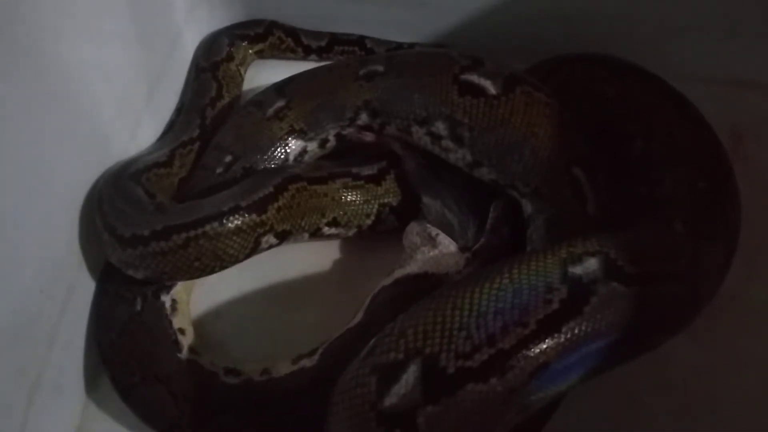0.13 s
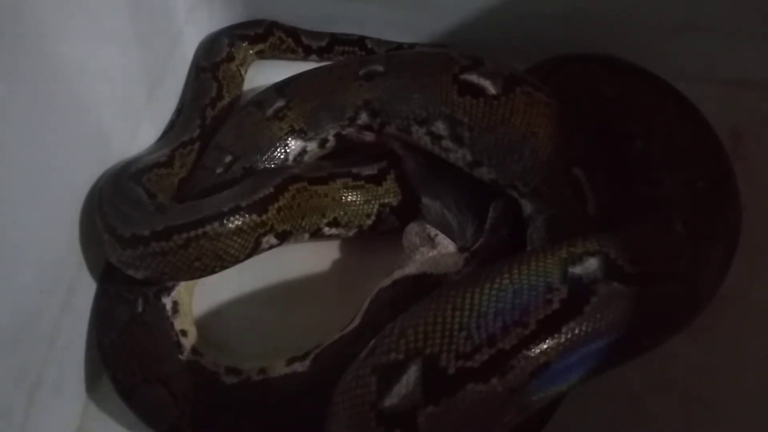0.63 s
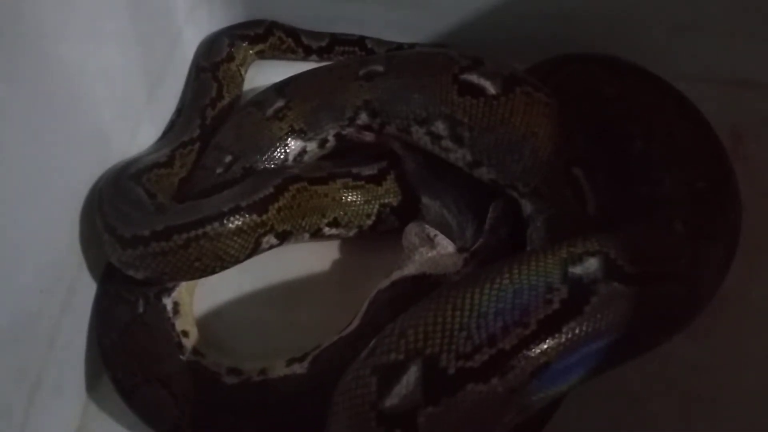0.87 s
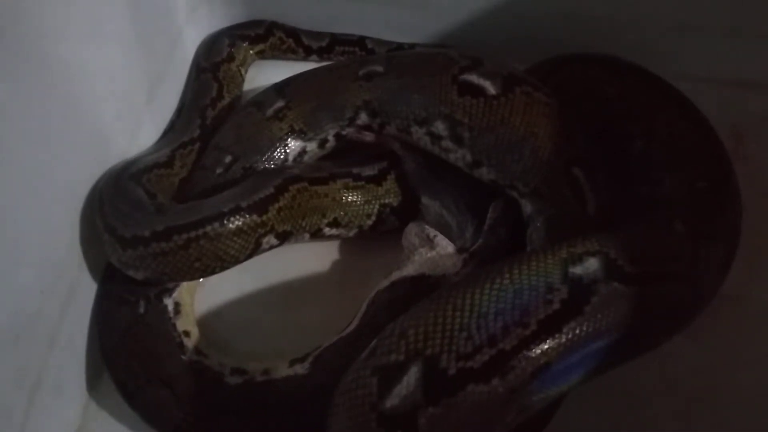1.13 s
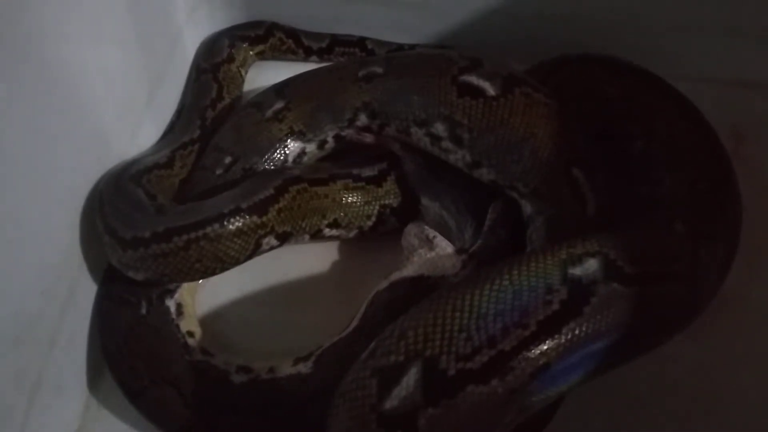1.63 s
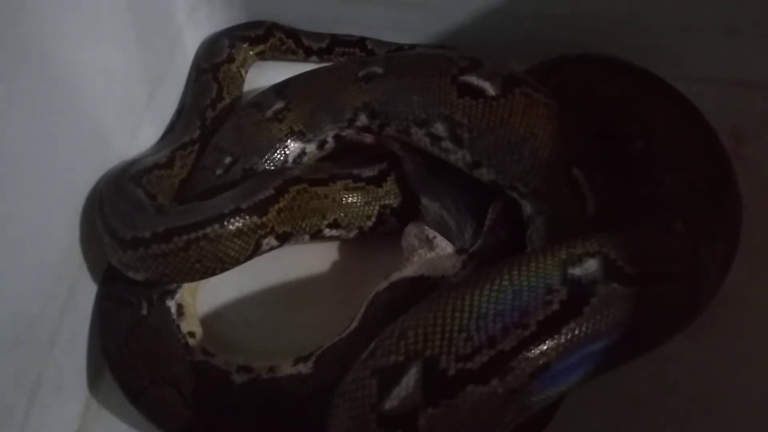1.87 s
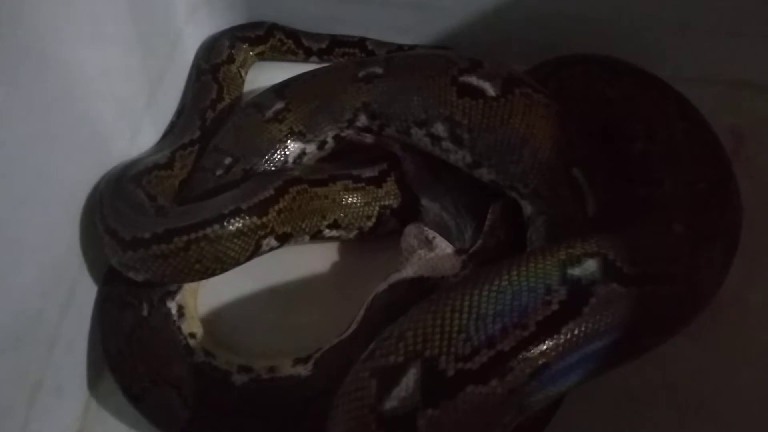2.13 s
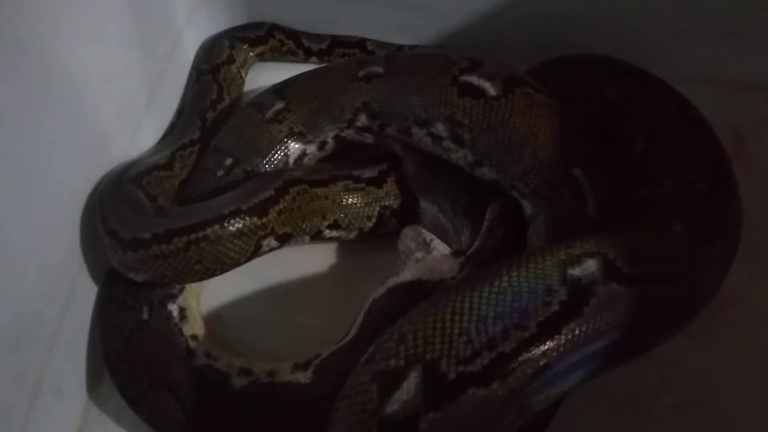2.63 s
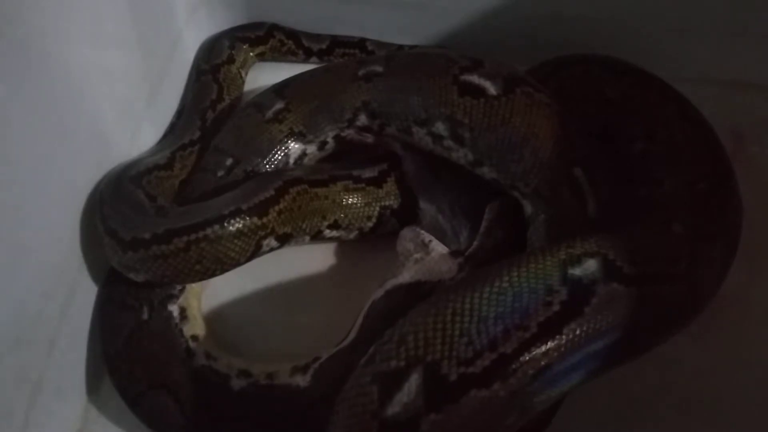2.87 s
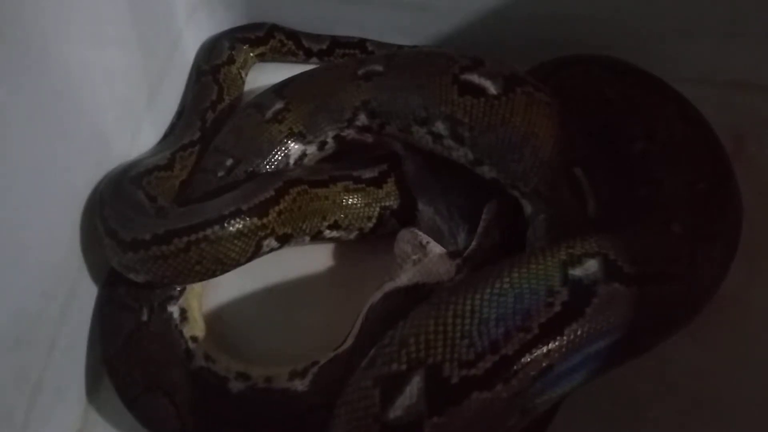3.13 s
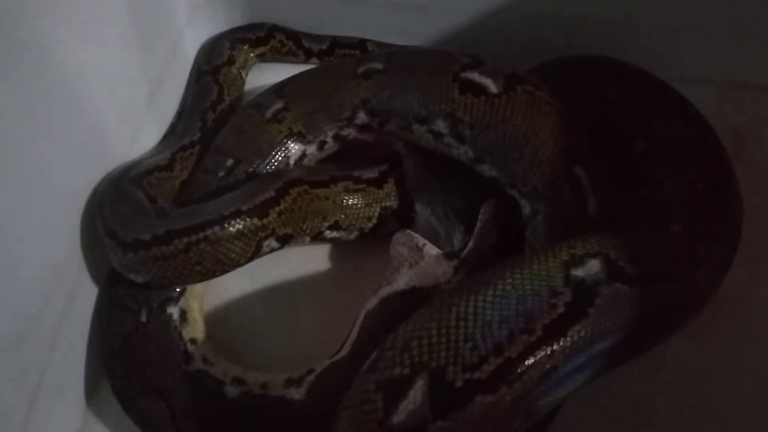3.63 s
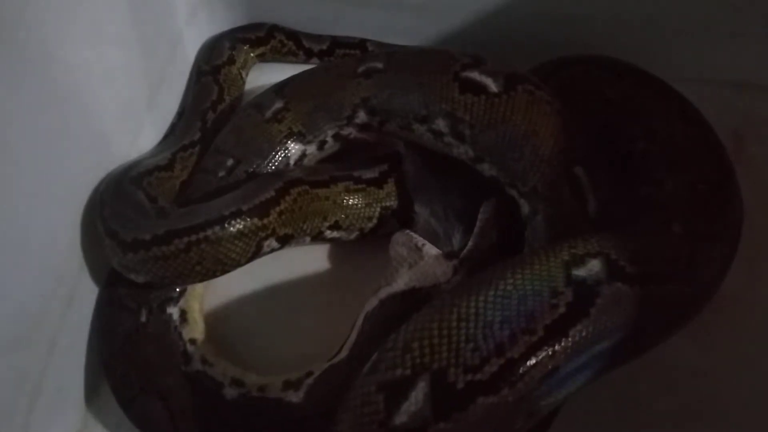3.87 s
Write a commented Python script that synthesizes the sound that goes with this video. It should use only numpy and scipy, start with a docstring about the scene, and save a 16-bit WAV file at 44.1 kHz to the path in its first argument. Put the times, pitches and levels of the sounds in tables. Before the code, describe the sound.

A cricket chirps about nine times a second throughout, a shrill, buzzy high trill leaning left, its echoes blurring together in a bare hard room. A grainy rustle close to the microphone fades within the first 0.2 seconds. Small dry ticks cluster at 1.5-1.7 and near 2.05 seconds; a faint bright rustle with thin snaps comes around 3.5-3.6. Low rumble, wavering hum, an early fading drone and soft hiss lie beneath.

```python
"""A cricket chirps nine times a second in a bare room at night, its echoes filling the gaps.
Distant rumble with a wavering hum, a higher drone and a soft hiss lie below; something close rustles and ticks.
Cricket: trains of falling sine pulses into a noise tail and ringing resonators. Background: filtered noise.
Rustles: grainy shaped noise. Ticks and snaps: clicks into banks of decaying modes."""
import sys
import numpy as np
from scipy import signal
from scipy.fft import rfft, irfft
from scipy.io import wavfile

SR = 44100
rng = np.random.default_rng(int(sys.argv[2]) if len(sys.argv) > 2 else 0)


def bounce(signal):
    """Save signal as a 16-bit WAV file at the path given by the first command-line argument."""
    frames = np.transpose(np.atleast_2d(signal))
    limited = np.clip(frames, -1, 1)
    pcm = np.round(limited * 32767).astype(np.int16)
    wavfile.write(sys.argv[1], SR, pcm)


def amplitude_ratio(level_db):
    """Convert a level in decibels to the matching linear amplitude (field) ratio."""
    exponent = np.asarray(level_db, float) / 20
    return 10 ** exponent


N = 176400


def rms_one(x):
    """Scale to rms 1."""
    return x / np.sqrt(np.mean(x ** 2) + 1e-20)


def in_time(rows):
    """Breakpoints (time [s], value) interpolated at every sample."""
    return np.interp(np.arange(N) / SR, *np.transpose(rows))


def at_hz(points, hz):
    """Breakpoints (frequency [Hz], value) read on a log frequency axis."""
    point_hz, value = np.transpose(points)
    return np.interp(np.log(hz), np.log(point_hz), value)


def drift(rate_hz):
    """Slow random curve, rms 1: two-pole low-passed noise made at SR / 40."""
    hop = 40
    r = np.exp(-2 * np.pi * rate_hz * hop / SR)
    slow = signal.lfilter([1], [1, -2 * r, r * r], rng.standard_normal(N // hop + 2002))[2000:]
    return np.interp(np.arange(N) / hop, np.arange(len(slow)), rms_one(slow))


def ring(x, hz, t60_s):
    """Two-pole resonator: a unit click starts a decaying sine of height 1."""
    r, w = amplitude_ratio(-60 / (t60_s * SR)), 2 * np.pi * hz / SR
    return signal.lfilter([0, np.sin(w)], [1, -2 * r * np.cos(w), r * r], x + 1e-18)


def band(x, low_hz, high_hz, order=2):
    """Butterworth band-pass."""
    return signal.sosfilt(signal.butter(order, [low_hz, high_hz], "band", fs=SR, output="sos"), x)


def coloured(spectrum):
    """Unrelated noise in each ear, shaped by a spectrum; rms 1."""
    hz = np.maximum(np.arange(N // 2 + 1) * SR / N, 1)
    white = rng.standard_normal((2, N))
    return rms_one(irfft(rfft(white) * amplitude_ratio(at_hz(spectrum, hz)), N))


def rumble_and_hiss():
    """Noise in half-octave bands, each with its own level, left-right likeness and lean."""
    # spectrum before normalising: (frequency [Hz], density [dB per Hz])
    floor = [(20, -6.5), (40, -4.5), (60, -2), (86, -5.5), (120, -4.5), (190, -22), (260, -23.5),
             (320, -16), (420, -27), (620, -42.5), (850, -25), (1200, -35), (2400, -35.5), (3000, -47),
             (6000, -50.5), (9000, -44), (12000, -55), (16000, -76)]
    # left-right correlation: (frequency [Hz], likeness [-1 to 1])
    likeness = [(30, 1), (125, 0.97), (250, 0.82), (500, 0.78), (1000, -0.26), (2000, -0.25), (4000, -0.58),
                (15000, 0.039)]
    # left over right: (frequency [Hz], level difference [dB])
    lean = [(30, 3), (250, -0.2), (1000, 3), (15000, 9.5)]
    # rms of the whole: (time [s], level [dB])
    levels = [(0, -39.5), (.5, -41.5), (1, -42), (2, -39.5), (3.2, -39.5), (4, -38.5)]
    edges_hz = 20 * 2 ** np.arange(0, 9.8, .5)
    white = rng.standard_normal((2, 2, N + SR // 2))
    out = 0
    for k, (low_hz, high_hz) in enumerate(zip(edges_hz, edges_hz[1:])):
        # neighbouring bands take different noise
        mid, side = band(white[k % 2], low_hz, high_hz)[:, -N:]
        hz = np.sqrt(low_hz * high_hz)
        alike = np.clip(at_hz(likeness, hz), -1, 1)
        half_lean_db = at_hz(lean, hz) / 2
        gain_db = at_hz(floor, hz) + .36 * drift(20.0) + np.array([[half_lean_db], [-half_lean_db]])
        out = out + amplitude_ratio(gain_db) * (np.sqrt(1 + alike) * mid + np.sqrt(1 - alike) * side * [[1], [-1]])
    return amplitude_ratio(in_time(levels)) * rms_one(out)


def narrow_noise(hz, width_hz):
    """Noise through a narrow band-pass, wavering as a tone; rms 1."""
    settled = band(rng.standard_normal(N + SR), hz - width_hz / 2, hz + width_hz / 2, order=1)[SR:]
    return rms_one(settled)


def hum():
    """Low wavering hum: very narrow noise, slightly stronger on the left."""
    # level midway between the ears: (time [s], level [dB])
    levels = [(0, -47.5), (1.2, -53), (1.6, -39.5), (2.2, -40), (2.8, -39.5), (3.3, -36.5), (3.7, -40),
              (4, -39.5)]
    ear_db = np.array([[.7], [-.7]])
    return amplitude_ratio(in_time(levels) + ear_db) * narrow_noise(62.43, 3.1)


def drone():
    """Higher drone that fades away: narrow noise, the same in both ears."""
    # rms: (time [s], level [dB])
    levels = [(0, -50), (.6, -46.5), (1.1, -47.5), (1.6, -49), (2.1, -65), (4, -62)]
    return amplitude_ratio(in_time(levels)) * narrow_noise(115.2, 12.5)


def rustles():
    """Hiss that swells and dies, mixed from dull and bright noise, grainy by fast random gain."""
    # (start [s], rise [s], length after the rise [s], t60 [s], relative level [dB], brightness [0-1])
    swells = [(-.05, 0.072, 0.17, 0.46, -37.5, 0.29), (1.55, 0.017, 0.17, 0.8, -59.5, 0.66),
              (1.695, 0.025, 0.067, 0.26, -53.5, 0.33), (3.51, 0.036, 0.074, 0.48, -49.5, 1)]
    # dull spectrum: (frequency [Hz], relative level [dB])
    dull_spectrum = [(1500, -7), (2500, -8), (3500, 2.5), (4300, 1), (5300, -10), (7000, 3), (9500, -7),
                     (11000, -27), (15000, -30)]
    # bright spectrum: (frequency [Hz], relative level [dB])
    bright_spectrum = [(1500, -28), (4500, -11), (6000, -10.5), (9000, 0.5), (12000, -13.5), (15000, -15)]
    release_s = .034
    t = np.arange(N) / SR
    dull = coloured([(300, -53.5)] + dull_spectrum)
    bright = coloured([(300, -72.5)] + bright_spectrum)
    out = 0
    for start, rise, length, t60, db, share in swells:
        decay_db = -60 * np.maximum(t - start - rise, 0) / t60
        shape = np.clip((t - start) / rise, 0, 1) * amplitude_ratio(db + decay_db)
        shape = shape * np.clip((start + rise + length - t) / release_s, 0, 1)
        share = np.clip(share, 0, 1)
        out = out + shape * (np.sqrt(1 - share) * dull + np.sqrt(share) * bright)
    grain_db = 3.5 * drift(300.0) + 2.2 * drift(40.0)
    return out * amplitude_ratio(grain_db)


def struck(events, modes):
    """Clicks into a bank of decaying modes, new strengths for every click, mode and ear."""
    body_below_hz, scatter_db = 2500, 1.8
    time_s, peak_db, body_db = np.transpose(events)
    out = np.zeros((2, N))
    for hz, mode_db, t60_s in modes:
        db = peak_db + body_db * (hz < body_below_hz) + mode_db
        db = db[:, None] + rng.normal(0, scatter_db, (len(time_s), 2))
        sign = rng.choice([-1, 1], (len(time_s), 1))
        clicks = np.zeros((2, N))
        clicks[:, (time_s * SR).astype(int)] = (amplitude_ratio(db) * sign).T
        out += ring(clicks, hz, t60_s)
    return out


def ticks():
    """Close ticks: clicks ringing low and high modes."""
    # (time [s], relative level [dB], extra level of the low modes [dB])
    tick_events = [(1.5002, -52, 4), (1.559, -46, 2), (1.5856, -46, -4), (1.696, -48, -10),
                   (1.7033, -43, -12), (1.7102, -43, -8), (1.7166, -41, -6), (1.7228, -40, -5),
                   (2.0465, -43, 1), (2.059, -47, -10), (2.0922, -45, -8)]
    # (frequency [Hz], relative level [dB], t60 [s])
    tick_modes = [(980, -25, .6), (1300, -9, .03), (1750, -6, .03), (2300, -4, .025), (3000, -4, .014),
                  (3500, 0, .014), (4200, -2, .01), (4800, -8, .008), (9500, -17, .003), (12500, -18, .003)]
    return struck(tick_events, tick_modes)


def snaps():
    """Thin close snaps: clicks ringing short treble modes."""
    # (time [s], relative level [dB], extra level of the low modes [dB])
    snap_events = [(3.5312, -54, 0), (3.581, -45.5, 0), (3.6154, -37, 0)]
    # (frequency [Hz], relative level [dB], t60 [s])
    snap_modes = [(10500, -12, .008), (12000, -7, .008), (13800, -5, .008)]
    return struck(snap_events, snap_modes)


def chirp_shape(u):
    """Gate of one chirp, u [s] from its middle: soft lead-in, loud part, rest, two closing pulses."""
    lead_s, half_s, edge_s, lead_gain = .037, .018, .0015, amplitude_ratio(-6.5)
    close_s, close_length_s, close_gain = .026, .01, amplitude_ratio(-6)

    def step(s):
        return np.clip(s / edge_s + .5, 0, 1)

    shape = lead_gain * step(u + lead_s) + (1 - lead_gain) * step(u + half_s)
    shape = shape * step(half_s - u)
    return shape + close_gain * step(u - close_s) * step(close_s + close_length_s - u)


def cricket():
    """Wing pulses, each falling in pitch, uneven in time and strength; pitch also sags over a chirp."""
    # (middle [s], relative level [dB])
    chirps = [(0.075, -34), (0.191, -34), (0.298, -35), (0.413, -35.5), (0.527, -35), (0.644, -37.5),
              (0.754, -35.5), (0.861, -34), (0.97, -36.5), (1.089, -33), (1.203, -34.5), (1.319, -34.5),
              (1.433, -35), (1.544, -35.5), (1.652, -35), (1.765, -35), (1.875, -34.5), (1.988, -37),
              (2.105, -38.5), (2.218, -36), (2.328, -36), (2.437, -35), (2.55, -36), (2.661, -36),
              (2.776, -36.5), (2.89, -35), (3.001, -35.5), (3.109, -35), (3.227, -36.5), (3.332, -35),
              (3.449, -35.5), (3.554, -36), (3.663, -35.5), (3.777, -33.5), (3.888, -35), (3.99, -34.5)]
    half_s = .018
    pulses_per_s, rate_drift_per_s, jitter_pulses = 200, 15, .35
    pitch_hz, sag_hz, sweep_hz, scatter_hz = 7520, 230, 1200, 130
    phase_scatter_rad, scatter_db = 2, 2
    rise_share, fall_nepers = .1, 1.8
    wing_hz, wing_width_hz = 7830, 2240
    overtone_db, overtone_fade_db_per_s = -24, 150

    t = np.arange(N) / SR
    mid_s, db = np.transpose(chirps)
    k = np.clip(np.searchsorted((mid_s[1:] + mid_s[:-1]) / 2, t), 0, len(mid_s) - 1)  # nearest chirp
    u = t - mid_s[k]

    # running pulse count; jitter grows away from the start of the loud part
    count = (u + half_s) * (pulses_per_s + rate_drift_per_s * drift(3.0))
    count = count + jitter_pulses * drift(40.0) * np.abs(u + half_s) / half_s + 40
    pulse = np.clip(count.astype(int), 0, 79)
    part = count % 1
    pitch_luck, phase_luck, level_luck = rng.standard_normal((len(mid_s), 80, 3))[k, pulse].T

    hz = pitch_hz - sag_hz * u / (2 * half_s) + scatter_hz * pitch_luck - sweep_hz * (part - .33)
    phase = 2 * np.pi * np.cumsum(hz) / SR + phase_scatter_rad * phase_luck

    pulses = np.minimum(part / rise_share, 1) * np.exp(-fall_nepers * part)
    pulses = pulses * np.minimum(10 * (1 - part), 1)
    pulses = pulses * amplitude_ratio(scatter_db * level_luck + db[k]) * chirp_shape(u)

    low_hz, high_hz = wing_hz - wing_width_hz / 2, wing_hz + wing_width_hz / 2
    wing = band(pulses * np.sin(phase), low_hz, high_hz, order=4)
    octave = amplitude_ratio(overtone_db - overtone_fade_db_per_s * u) * pulses * np.sin(2 * phase)
    return wing + octave


def room(x):
    """Direct sound, a dying diffuse noise tail and a few pitches that ring on."""
    # diffuse tail before the wall low-pass: [left, right] level [dB]
    tail_db = [-1.5, 1.5]
    # pitches at which the room rings on: frequency [Hz]
    ring_hz = [6801, 7036, 7233, 7309, 7447, 7610, 7715, 7809]
    # their strengths: (left [dB], right [dB])
    ring_db = [(-17, -29), (-22, -11), (-27, -17), (-20.5, -31), (-19.5, -17.5), (-21.5, -29), (-31.5, -27),
               (-22, -23.5)]
    tail_t60_s, wall_cut_hz, ring_t60_s, ear_lag_s = 1.6, 7700, .3, .0003
    t = np.arange(2 * SR) / SR
    tail = rng.standard_normal((2, len(t))) * amplitude_ratio(-60 * t / tail_t60_s) * (t > .002)
    tail *= amplitude_ratio(np.array(tail_db))[:, None] / np.sqrt(np.sum(tail ** 2, axis=1, keepdims=True))
    tail = signal.sosfilt(signal.butter(4, wall_cut_hz, fs=SR, output="sos"), tail)
    tail[[0, 1], [0, int(ear_lag_s * SR)]] = 1  # direct sound, later on the right
    out = signal.fftconvolve(x[None], tail, axes=1)[:, :N]
    unit_energy = np.sqrt(4 * np.log(1000) / (ring_t60_s * SR))
    for hz, ears_db in zip(ring_hz, ring_db):
        lags = rng.integers(0, 40, size=2)  # samples
        rung = ring(x, hz, ring_t60_s) * unit_energy
        out = out + amplitude_ratio(np.array(ears_db))[:, None] * np.array([np.roll(rung, lag) for lag in lags])
    return out


def scene():
    """Background, close noises leaning left, and the cricket in its room."""
    # cricket and its echoes: [left, right] gain [dB]
    cricket_db = [6.5, 1.03]
    background = rumble_and_hiss() + hum() + drone()
    near = (rustles() + ticks() + snaps()) * amplitude_ratio(np.array([[1.2], [-1.2]]))
    return background + near + room(cricket()) * amplitude_ratio(np.array(cricket_db))[:, None]


def band_limit(x):
    """A steep low-pass at the top of the band."""
    return signal.sosfilt(signal.butter(12, 15720, fs=SR, output="sos"), x)


def record(dry):
    """The finished mix as it is stored."""
    return band_limit(dry)


dry = scene()
out = record(dry)
bounce(out)
```